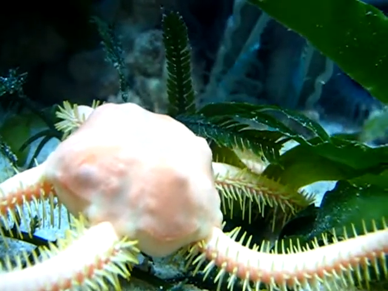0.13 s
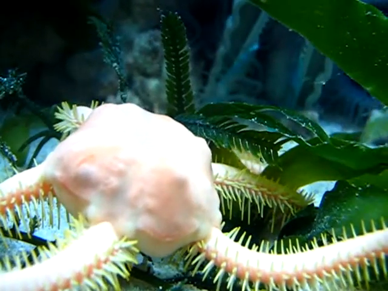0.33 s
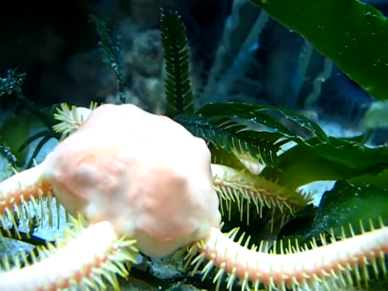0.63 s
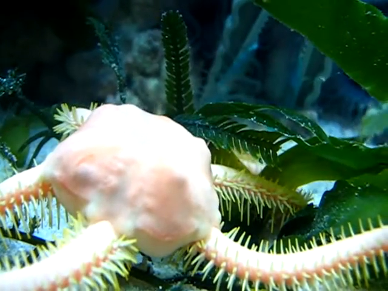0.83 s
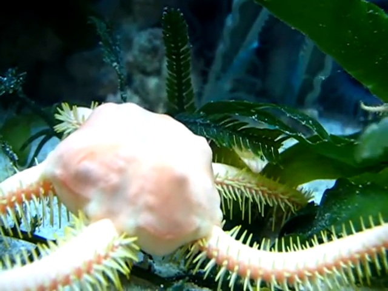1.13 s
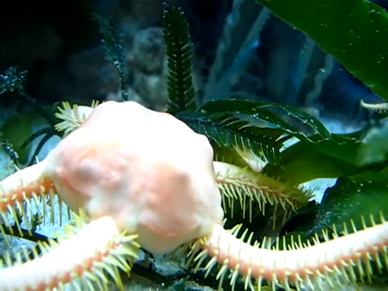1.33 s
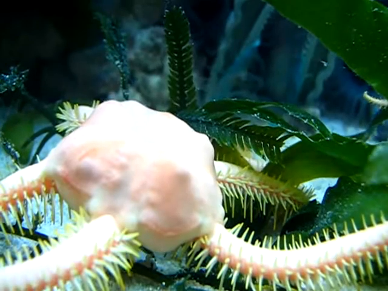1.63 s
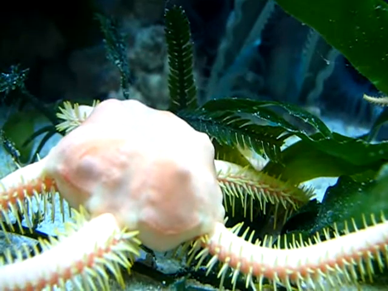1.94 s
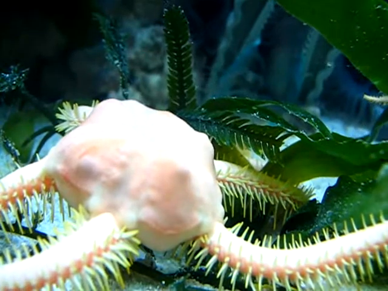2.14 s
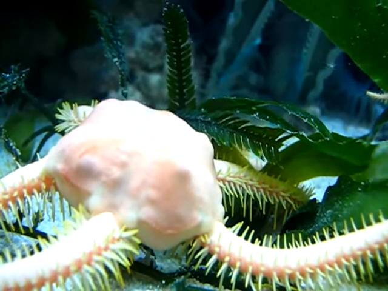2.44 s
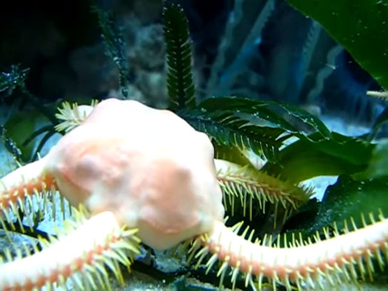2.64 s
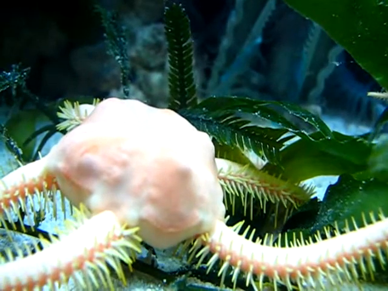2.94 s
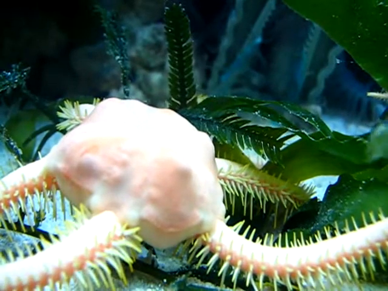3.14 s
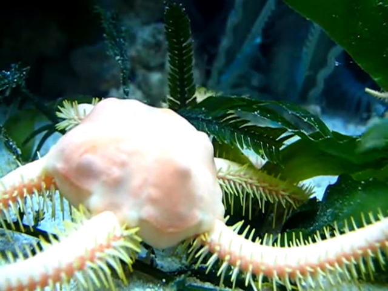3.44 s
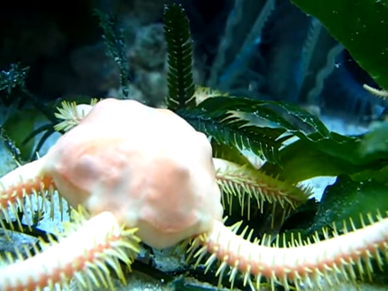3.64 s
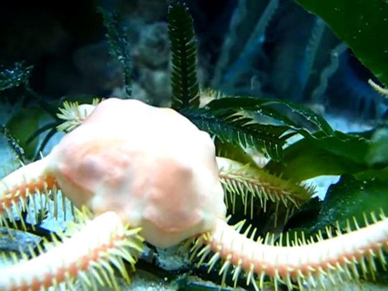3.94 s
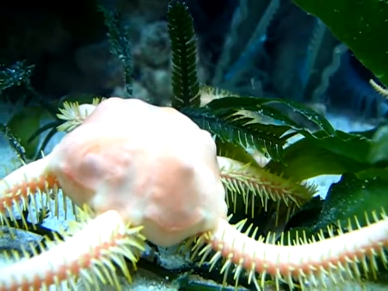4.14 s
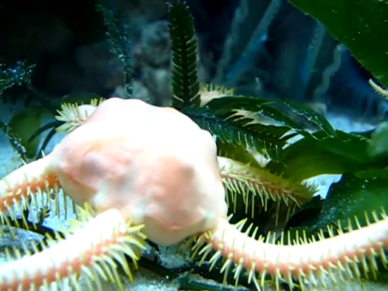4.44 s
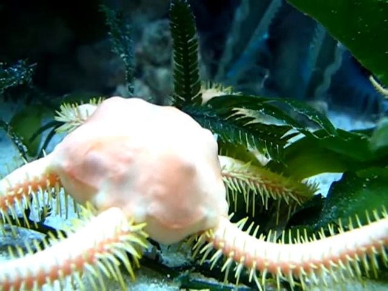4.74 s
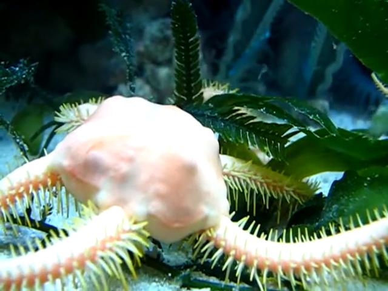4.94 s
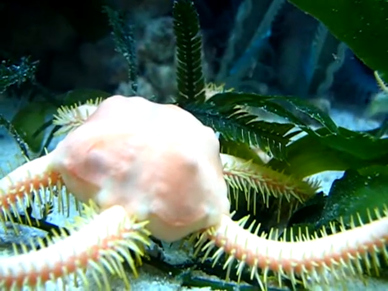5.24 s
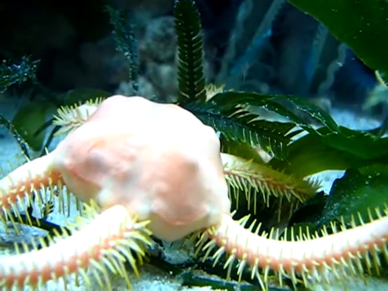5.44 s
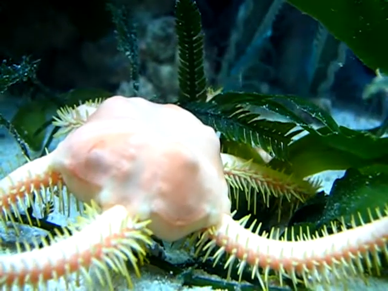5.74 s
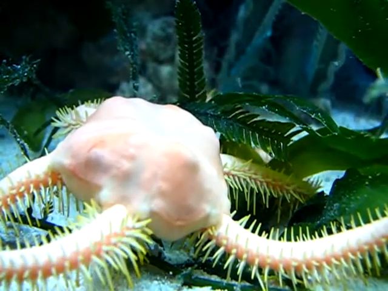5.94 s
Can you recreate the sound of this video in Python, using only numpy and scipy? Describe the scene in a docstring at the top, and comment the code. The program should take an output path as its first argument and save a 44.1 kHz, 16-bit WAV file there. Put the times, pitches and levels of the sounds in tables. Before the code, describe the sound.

Steady low hum and gentle water rush of a fish tank, with a high whine and small knocks, ending abruptly in a click.

```python
"""Aquarium pump, close to the glass

A mains-driven pump hums over the soft rush of circulating water, which keeps the tank ringing.
Faint ticks, bumps, rustles and one chirp sound, and the camera's electronics whine thinly.
Near the end the recorder sticks for a moment, clicking in and out, and falls silent."""
import sys
import numpy as np
from scipy import signal
from scipy.fft import rfft, irfft
from scipy.io import wavfile

SR = 44100
rng = np.random.default_rng(int(sys.argv[2]) if len(sys.argv) > 2 else 0)


def to_wav(s):
    """Save 16-bit WAV."""
    ch = np.atleast_2d(s).T  # columns
    pcm = np.round(np.clip(ch, -1, 1) * 32767)  # PCM
    wavfile.write(sys.argv[1], SR, pcm.astype(np.int16))


N = 268112
T = np.arange(N) / SR
FREQS = np.maximum(np.arange(N // 2 + 1) * SR / N, 1)
CONTACT_TOP_HZ = 4120  # treble limit of ticks and casing clicks


# Pump hum. Each row: multiple of the mains, level in dB, left minus right in dB.
HUM_HARMONICS = [(1, -42.5, 5), (2, -44.5, 1), (4, -28, 2), (5, -39, 3), (6, -53.5, -1.5), (7, -57, 8.5),
                 (8, -56, 0.5), (10, -60, 8.5), (27, -71.5, 15), (28, -66.5, 4.5)]

def pump(mains_hz=50, motor_hz=44.6, waver_db=0.16, buzz_db=-79):
    """Harmonics lock to the mains, the housing buzzes faintly, and a slower motor beats with the hum."""
    hum = sum(tone(multiple * mains_hz) * undb(db + waver_db * drift(12)) * pan(balance_db)
              for multiple, db, balance_db in HUM_HARMONICS)
    multiples = np.arange(39, 68)
    scatter = np.clip(rng.standard_normal((len(multiples), 2)), -2, 1.5)
    buzz = sum(tone(multiple * mains_hz) * undb(buzz_db + 4 * level) * pan(4 + 5 * balance)
               for multiple, (level, balance) in zip(multiples, scatter))
    motor = tone(motor_hz) * undb(-55) * pan(5)
    return hum + buzz + motor


# Water and ventilation spectrum. Each row: frequency in Hz, density in dB per Hz.
RUSH_SPECTRUM = [(25, -79.5), (55, -74.5), (110, -67.5), (145, -60.5), (180, -61), (215, -58.5),
                 (275, -70.5), (470, -76), (610, -72), (880, -77), (1150, -82), (2200, -86.5),
                 (6000, -87.5), (11000, -94.5)]
# Stereo spread of the rush. Each row: frequency in Hz, side minus mid in dB, left minus right in dB.
RUSH_SPREAD = [(70.5, -2, 14.5), (160, -9, -1), (300, -19.5, 4), (640, -1.5, 1.5), (1200, -4, 0.4),
               (3200, -1.5, 3), (6000, 2.5, 0.4), (10000, 0, 2)]

def water(flicker_db=1.06):
    """Circulating water rushes, more diffuse in the treble; its midrange follows the flow and flickers."""
    hz, side_db, balance_db = np.transpose(RUSH_SPREAD)
    side_gain = undb(over_pitch(hz, side_db))
    mid, side = rfft(rng.standard_normal((2, N))) * np.sqrt(SR / 2)
    white = np.array([mid + side_gain * side, mid - side_gain * side]) / np.sqrt(1 + side_gain ** 2)
    density = undb(over_pitch(*np.transpose(RUSH_SPECTRUM)))
    spectrum = white * density * pan(over_pitch(hz, balance_db))
    midrange = irfft(spectrum * abs(resonance(620, 580)), N)
    midrange_gain = undb(flow_db() + flicker_db * drift(18))
    return irfft(spectrum, N) + midrange * (midrange_gain - 1)


def flow_db(start_db=-1.2, pickup_db=1.44):
    """The flow starts a little weak and picks up once, smoothly."""
    return start_db + pickup_db * ease(middle_s=3.5, scale_s=.25)


# Tank and cabinet resonances. Each row: frequency in Hz, width in Hz, level in dB at a flow of 0 dB.
TANK_MODES = [(145.9, 13, -52.5), (164.6, 19, -53.5), (623, 110, -59), (778.5, 22, -57.5), (814.2, 18, -58),
              (845, 20, -64), (898, 20, -63), (1037, 70, -64)]

def tank():
    """The flow keeps narrow resonances ringing unevenly."""
    ringing = sum(band_noise(hz, width_hz) * undb(db) for hz, width_hz, db in TANK_MODES)
    return ringing * undb(flow_db()) * pan(2.3)


# Camera whines. Each row: frequency in Hz, level in dB, left minus right in dB, left lead in radians.
WHINE_TONES = [(7867, -49, -1.8, 0), (8265, -56.7, -8, 1)]

def camera_whine(frame_hz=30, first_flip_s=.0105, flutter_db=0.44):
    """The camera's whine flips its sign at every frame."""
    flip = signal.square(np.pi * frame_hz * (T - first_flip_s))
    return flip * sum(tone(hz, lead_rad) * undb(db + flutter_db * drift(25)) * pan(balance_db)
                      for hz, db, balance_db, lead_rad in WHINE_TONES)


# Thin tones. Each row: frequency in Hz, wander in Hz, level in dB, left minus right in dB.
THIN_TONES = [(4867, 5, -71, -5), (6089, 6, -74, 0), (6691, 7, -73, 6), (7303, 7, -60.5, -6),
              (9135, 10, -73, 0)]
# Hiss bands. Each row: centre in Hz, nominal width in Hz, level in dB, left minus right in dB.
HISS_BANDS = [(1428, 220, -63.5, 2), (4190, 750, -67, 9.5), (7830, 2600, -58.5, -17.5),
              (8750, 245.4, -64.5, -16)]

def electronics(settled_db=-60, flutter_db=0.44, hiss_width_scale=0.58):
    """The electronics give hiss and thin wandering tones; one more swells, overshoots and settles."""
    thin = sum(tone(hz + wander_hz * drift(2.1)) * undb(db) * pan(balance_db)
               for hz, wander_hz, db, balance_db in THIN_TONES)
    fade_db = settled_db - 6.5 * (1 - ease(middle_s=.72, scale_s=.2))
    overshoot_db = 2 * swell(middle_s=1.35, half_width_s=.4)
    swelling = tone(4259 + 5 * drift(3.5)) * undb(fade_db + overshoot_db + flutter_db * drift(13))
    hiss = sum(band_noise(hz, width_hz * hiss_width_scale) * undb(db) * pan(balance_db)
               for hz, width_hz, db, balance_db in HISS_BANDS)
    return thin + swelling * pan(8.5) + hiss


# Ticks on the glass. Each row: start in seconds, ring level in dB.
GLASS_TICKS = [(1.981, -42.5), (1.989, -45), (2.253, -45.5), (2.331, -51.5), (2.67, -49)]

def ticks(ring_hz=2620, rise_s=0.0029):
    """Each tick is a short ring with a crack, rounded by the water and glass it passes through."""
    crack = undb(-2) * band_noise(2500, 3600)
    out = 0
    for start_s, db in GLASS_TICKS:
        ring = np.sin(2 * np.pi * ring_hz * (T - start_s))
        out += undb(db) * contact(start_s, rise_s) * (ring + crack)
    return low_pass(out, CONTACT_TOP_HZ) * pan(2)


# Bumps on the camera. Each row: start in seconds, thump level in dB, unfiltered click level in dB.
CAMERA_BUMPS = [(1.2195, -32.5, -38), (3.495, -34, -56), (4.334, -35, -43.5), (4.473, -33, -56),
                (4.698, -31, -37.5)]

def bumps(body_hz=85, thump_rise_s=0.0054, click_rise_s=.0008):
    """At each bump the camera's casing clicks and its body rocks for a cycle or two."""
    casing = band_noise(2700, 3400)
    thumps = clicks = 0
    for start_s, thump_db, click_db in CAMERA_BUMPS:
        rocking = np.sin(2 * np.pi * body_hz * (T - start_s))
        thumps += undb(thump_db) * contact(start_s, thump_rise_s) * rocking
        clicks += undb(click_db) * contact(start_s, click_rise_s) * casing
    return thumps * pan(5.4) + low_pass(clicks, CONTACT_TOP_HZ) * pan(2)


def chirp(start_s=4.682, start_hz=3870, glide_hz_per_s=14000, roughness=.55):
    """A tiny rough chirp, probably a bubble, glides upward just before the last bump."""
    hz = start_hz + glide_hz_per_s * np.clip(T - start_s, 0, .04)
    envelope = undb(-47.5) * contact(start_s, rise_s=.006)
    return tone(hz) * envelope * (1 + roughness * drift(250))


# Rustles. Each row: middle in seconds, half-width in seconds, centre in Hz, width in Hz, level in dB.
RUSTLE_SWELLS = [(.04, 0.15, 1600, 664, -51), (.235, 0.094, 1576, 661, -48.5), (0.169, .15, 3300, 600, -55),
                 (.475, 0.073, 1505, 403, -48), (3.182, 0.11, 2760, 3000, -52.5),
                 (3.226, .036, 6700, 1590, -55), (3.6, 0.013, 1740, 600, -47)]

def rustles():
    """Soft swells of noise, each in one resonance, diffuse in the room."""
    out = 0
    for middle_s, half_width_s, hz, width_hz, db in RUSTLE_SWELLS:
        left, right, both = (band_noise(hz, width_hz) for _ in range(3))
        diffuse = (np.array([left, right]) + both) / np.sqrt(2)
        out += undb(db) * swell(middle_s, half_width_s) * diffuse
    return out * pan(1.5)


def stuck_buffer(loop_samples=32, decay_samples=2.2, whine_cycles=6):
    """A tiny looping buffer buzzes: one spike a round and a scrap of whine."""
    position = np.arange(N) % loop_samples
    spike = undb(-25.5) * np.exp(-position / decay_samples)
    whine = undb(-42) * np.cos(2 * np.pi * whine_cycles * position / loop_samples)
    return -(spike + whine * pan(-3))


def undb(db):
    """Decibels to gain."""
    return 10 ** (np.asarray(db) / 20)


def pan(balance_db):
    """Left and right gains, left minus right given in dB."""
    return undb(np.array([[.5], [-.5]]) * balance_db)


def over_pitch(hz, values):
    """Points joined on a log-frequency axis."""
    return np.interp(np.log(FREQS), np.log(hz), values)


def resonance(hz, width_hz):
    """Response of one damped resonance, gain 1 at its centre."""
    return 1 / (1 + 1j * (FREQS / hz - hz / FREQS) * hz / width_hz)


def band_noise(hz, width_hz):
    """Noise of rms 1 through a resonance applied twice."""
    noise = irfft(rfft(rng.standard_normal(N)) * resonance(hz, width_hz) ** 2, N)
    return noise / noise.std()


def drift(rate_hz):
    """Smooth random motion of rms 1, rolling off near rate_hz."""
    response = np.exp(-(FREQS / (rate_hz + 1)) ** 2) * (FREQS > 1)
    motion = irfft(rfft(rng.standard_normal(N)) * response, N)
    return motion / motion.std()


def tone(hz, lead_rad=0):
    """Stereo sine of rms 1 on a steady or moving pitch; the left may lead."""
    phase = 2 * np.pi * (np.cumsum(hz + np.zeros(N)) / SR + rng.random())
    return np.sqrt(2) * np.sin([phase + lead_rad, phase])


def contact(start_s, rise_s):
    """Soft-onset envelope: peaks at 1 after rise_s, then dies away."""
    age = np.maximum(T - start_s, 0) / rise_s
    return age * np.exp(1 - age)


def swell(middle_s, half_width_s):
    """Bell-shaped envelope of peak 1."""
    return np.exp(-((T - middle_s) / half_width_s) ** 2)


def ease(middle_s, scale_s):
    """Smooth step from 0 to 1."""
    return (1 + np.tanh((T - middle_s) / scale_s)) / 2


def low_pass(x, hz):
    """Steep treble cut."""
    return signal.sosfilt(signal.ellip(10, .1, 70, hz, fs=SR, output="sos"), x + 1e-18)


def scene():
    """Everything at the microphone."""
    steady = pump() + water() + tank() + camera_whine() + electronics()
    return steady + ticks() + bumps() + chirp() + rustles()


def record(dry, stick_s=5.4618, slide_s=.0022, mute_s=5.4721, top_hz=10900, mute_top_hz=15800):
    """The recorder cuts the top; it sticks, buzzing and sliding to an offset, then mutes with a click."""
    slide = np.clip((T - stick_s) / slide_s, 0, 1)
    offset = -undb(-21) * pan(3)
    sticking = (1 - slide) * dry + slide * offset + stuck_buffer() * (T > stick_s)
    muted = low_pass(sticking, top_hz) * (T < mute_s)
    return low_pass(muted, mute_top_hz)


dry = scene()
out = record(dry)
to_wav(out)
```